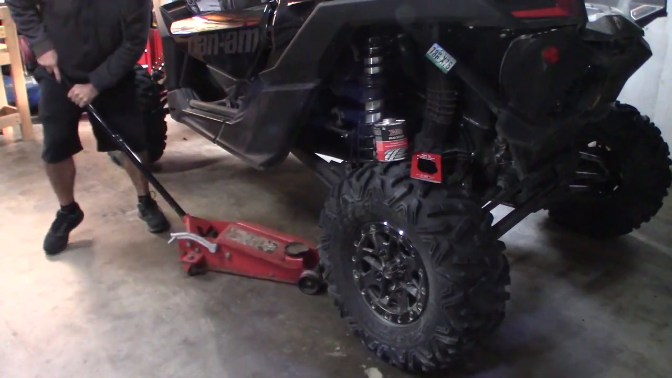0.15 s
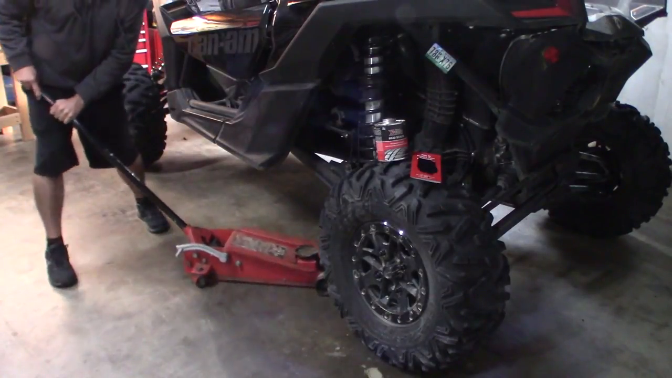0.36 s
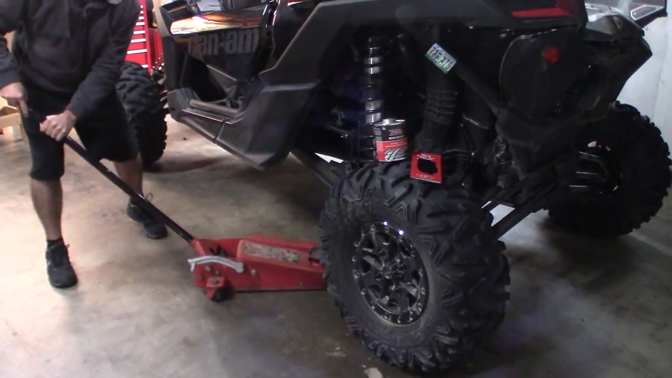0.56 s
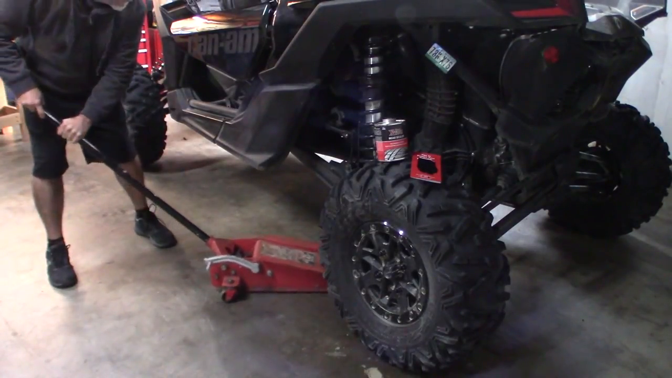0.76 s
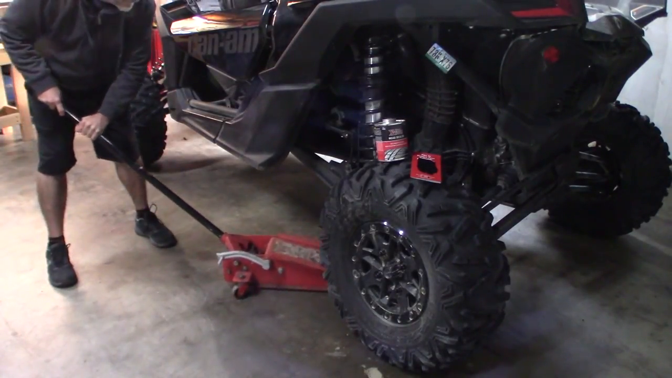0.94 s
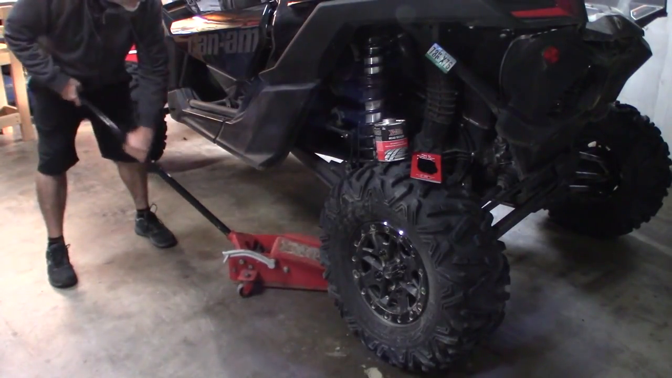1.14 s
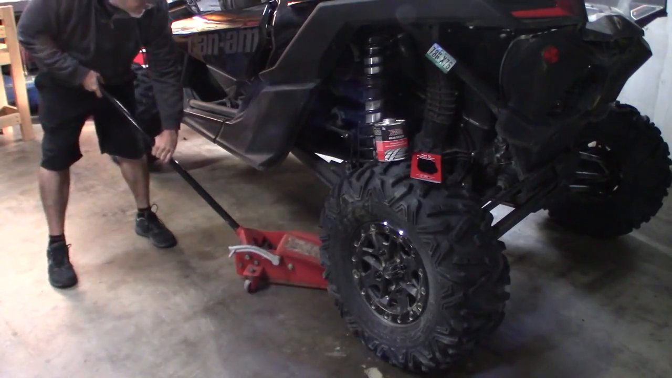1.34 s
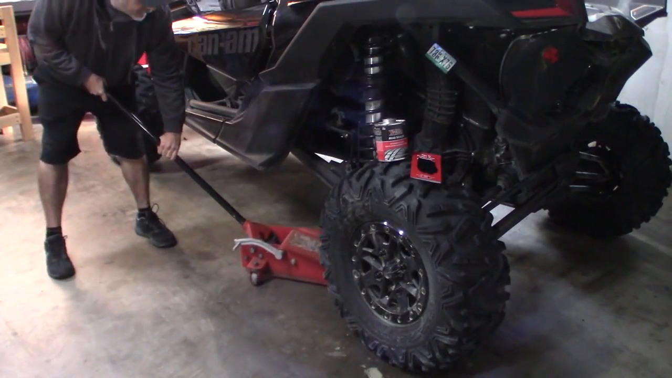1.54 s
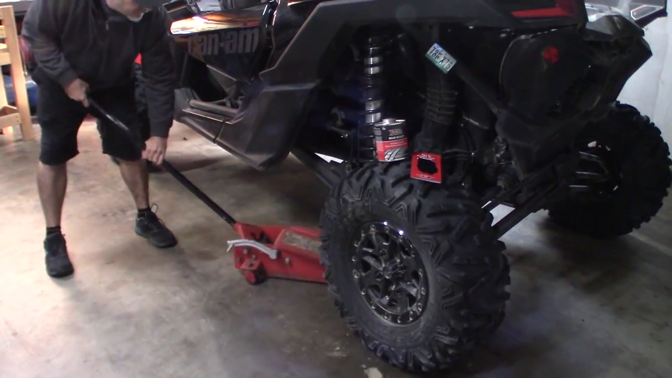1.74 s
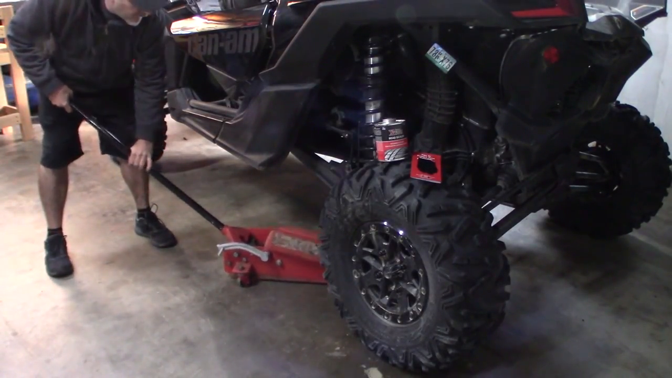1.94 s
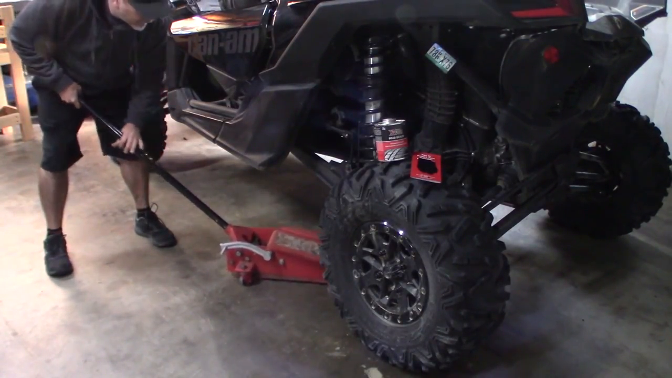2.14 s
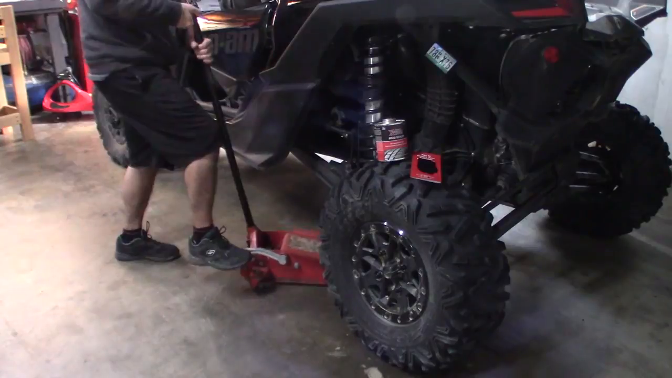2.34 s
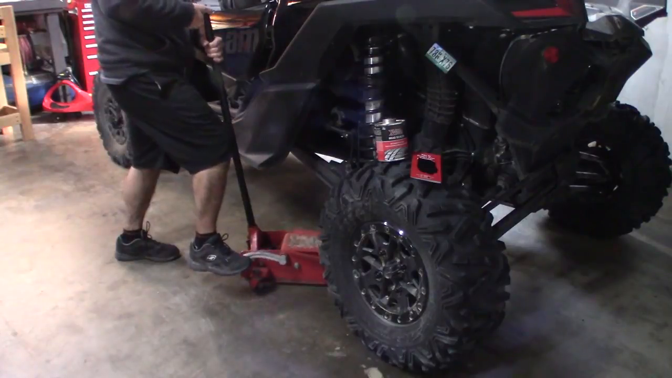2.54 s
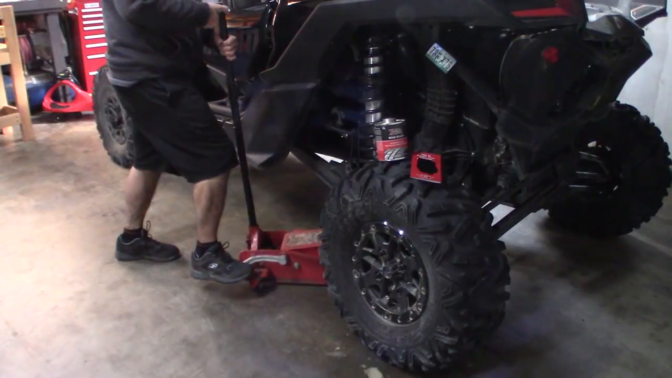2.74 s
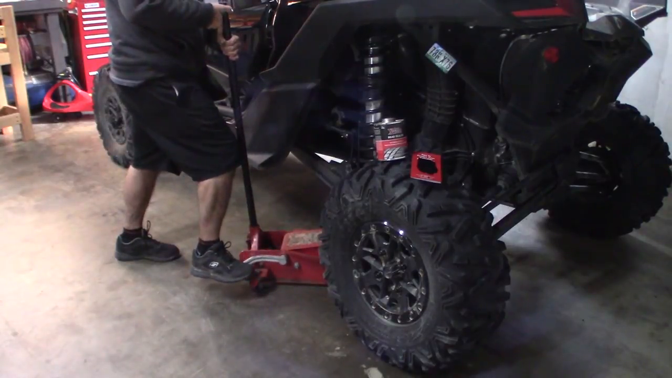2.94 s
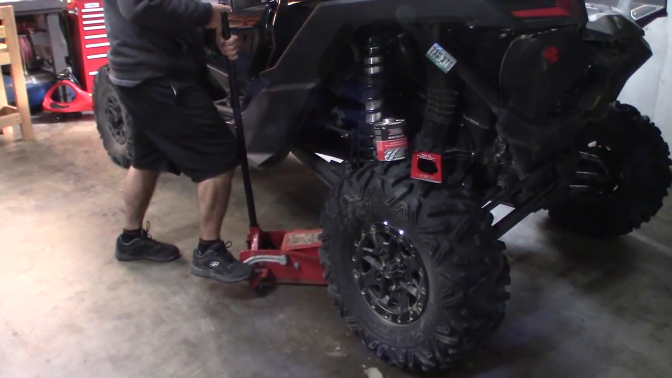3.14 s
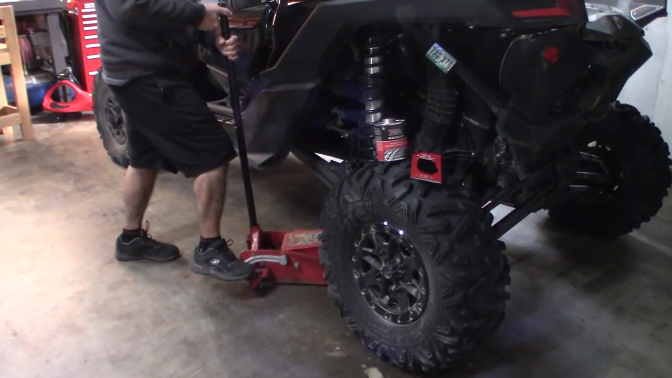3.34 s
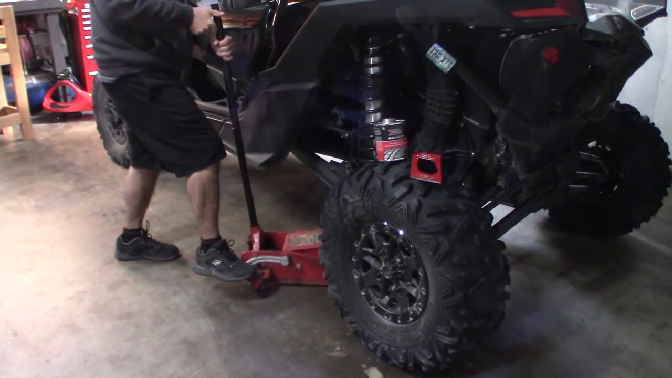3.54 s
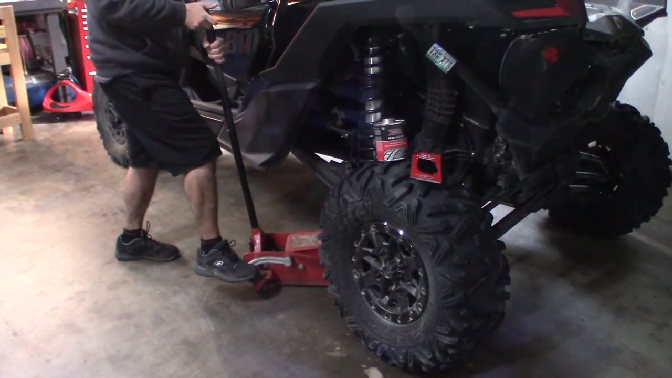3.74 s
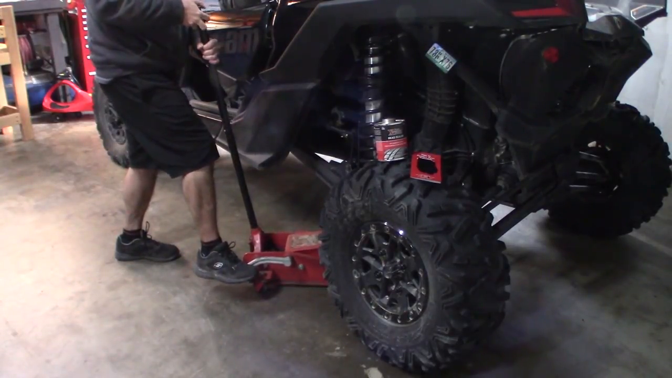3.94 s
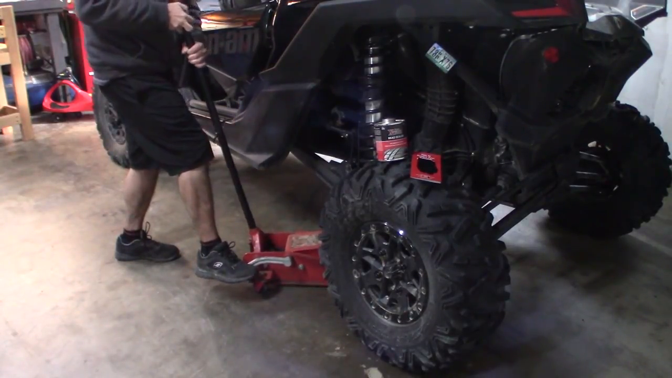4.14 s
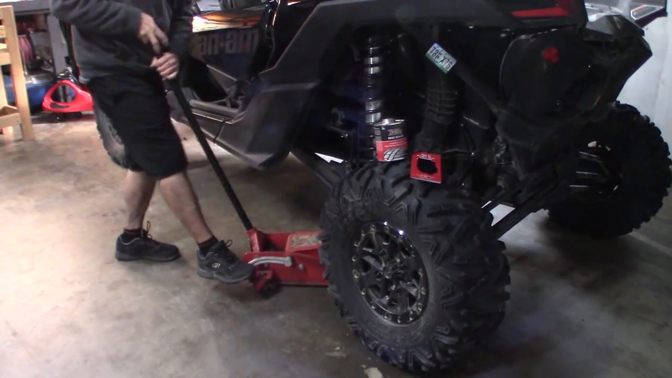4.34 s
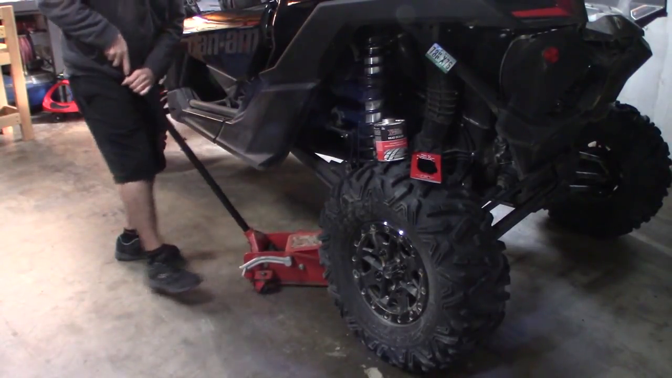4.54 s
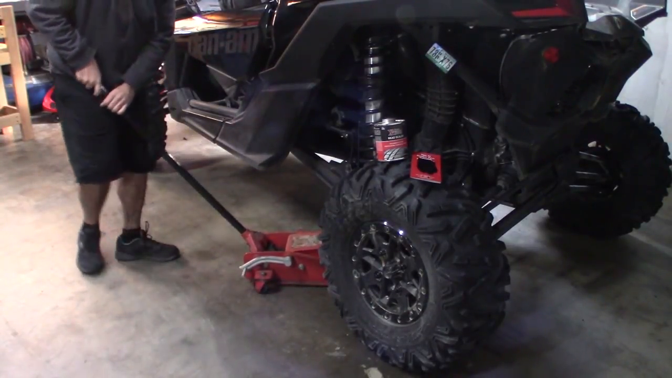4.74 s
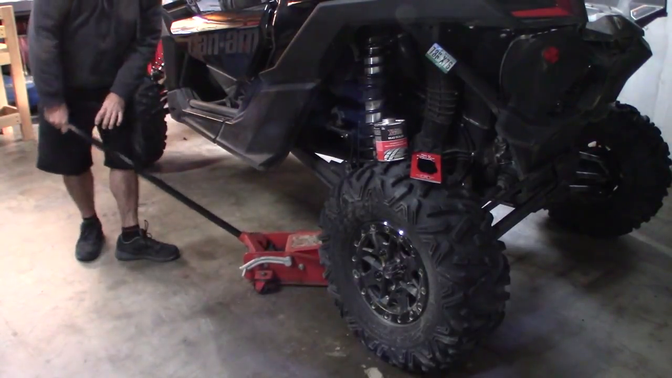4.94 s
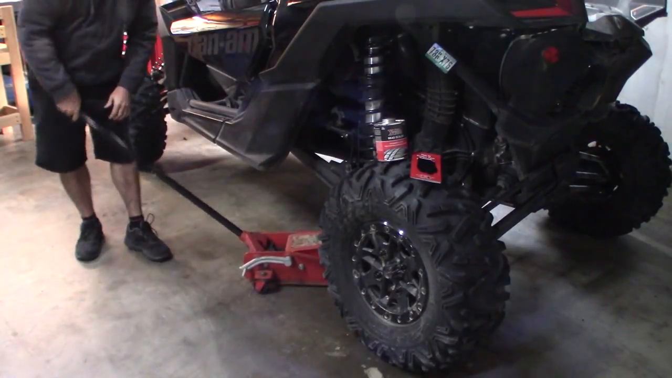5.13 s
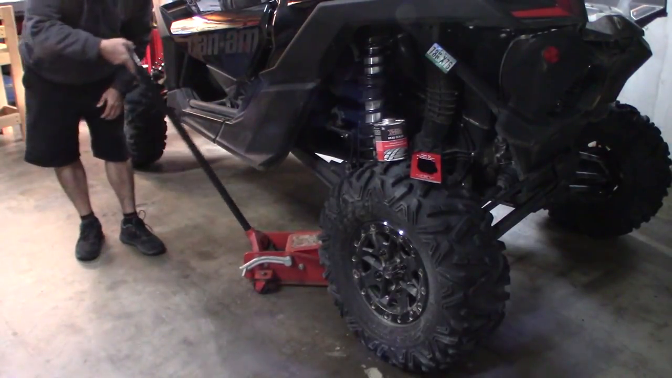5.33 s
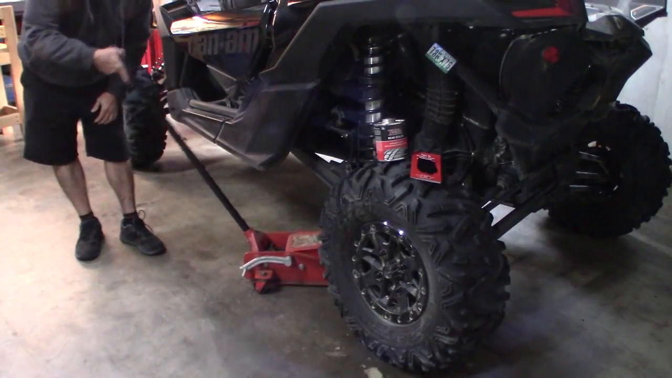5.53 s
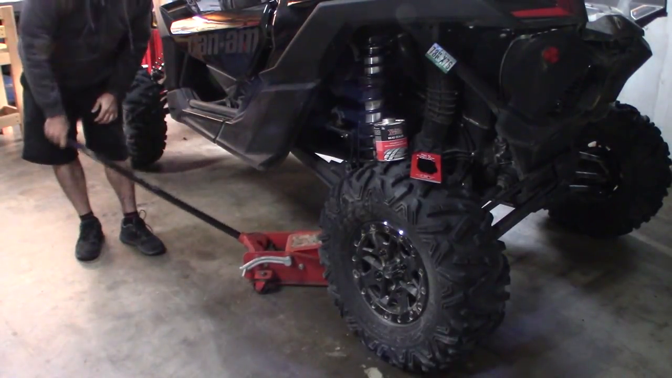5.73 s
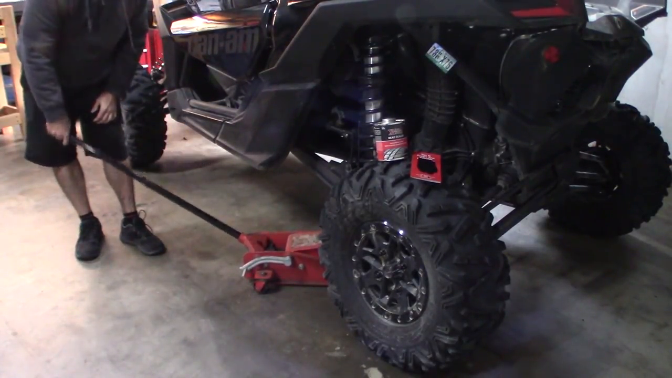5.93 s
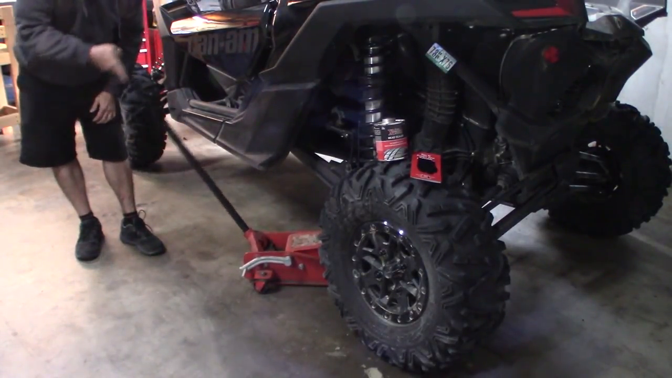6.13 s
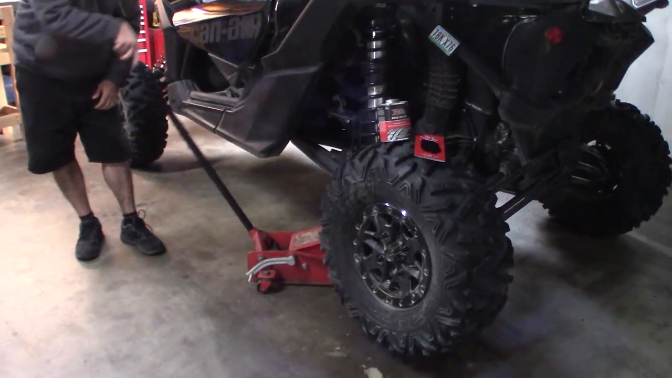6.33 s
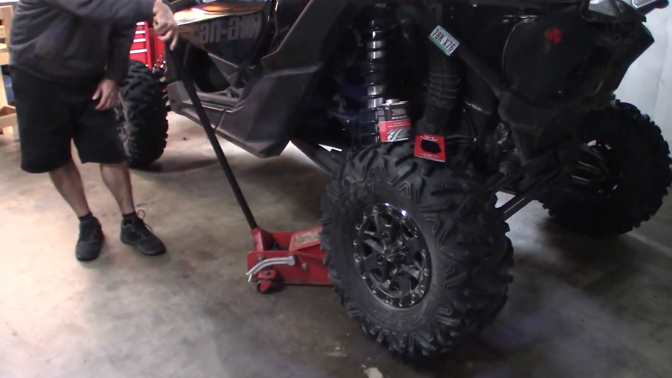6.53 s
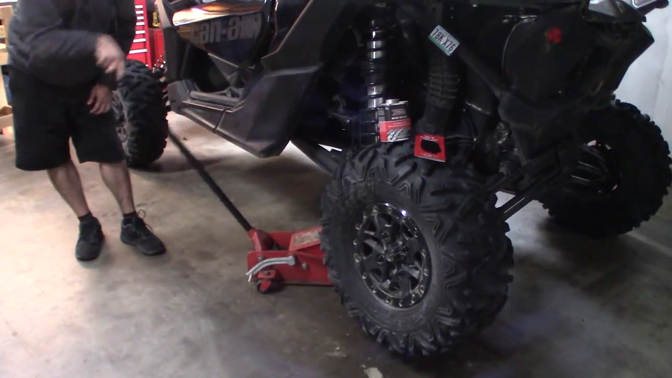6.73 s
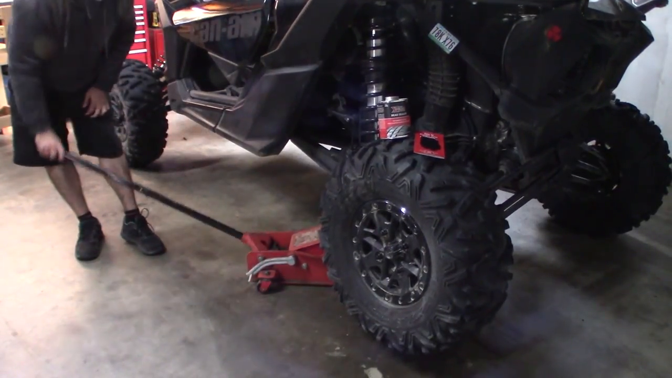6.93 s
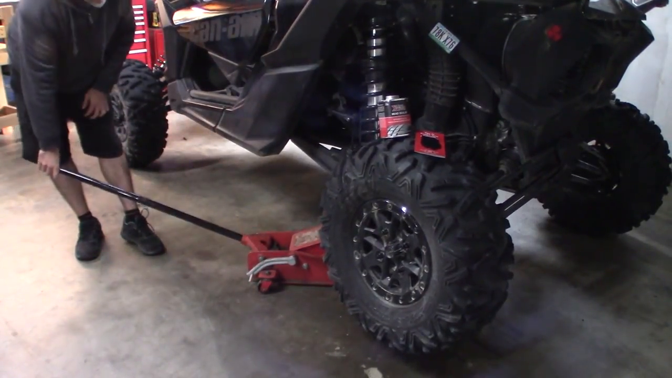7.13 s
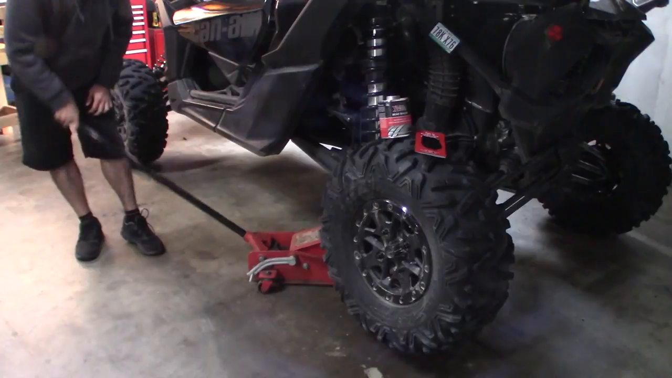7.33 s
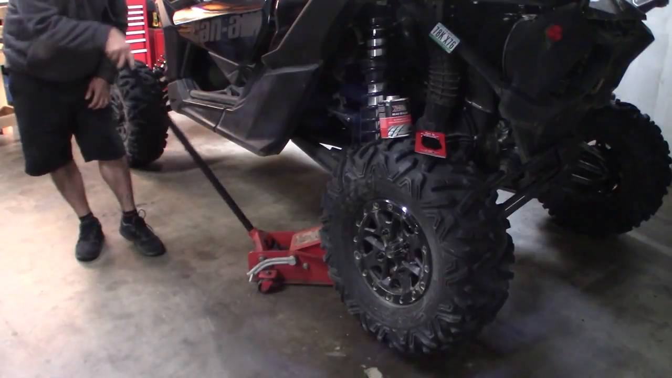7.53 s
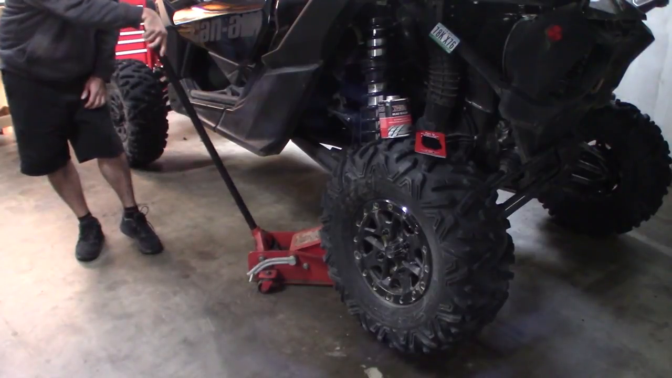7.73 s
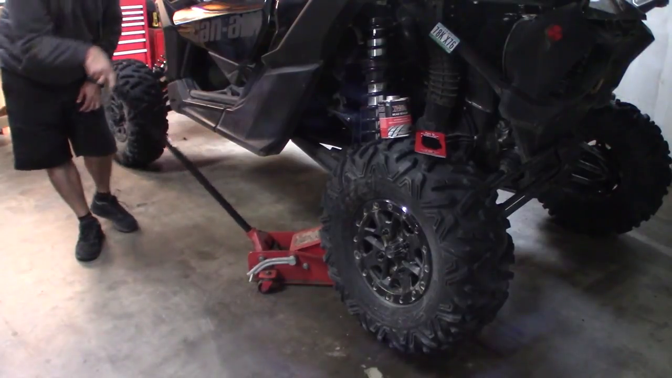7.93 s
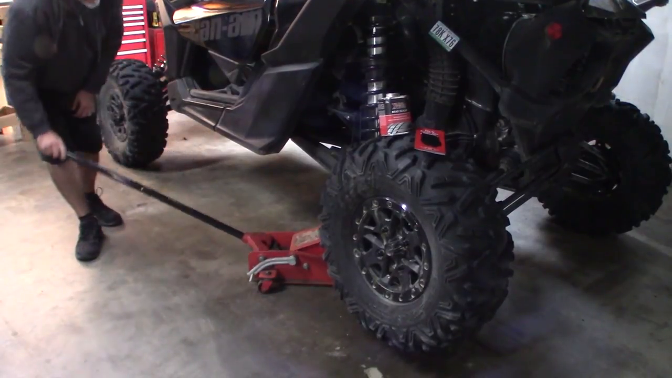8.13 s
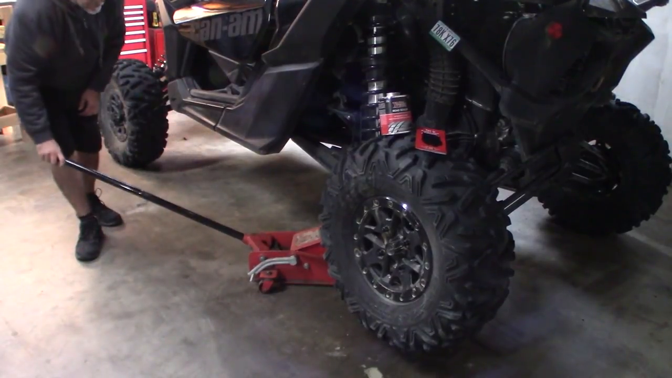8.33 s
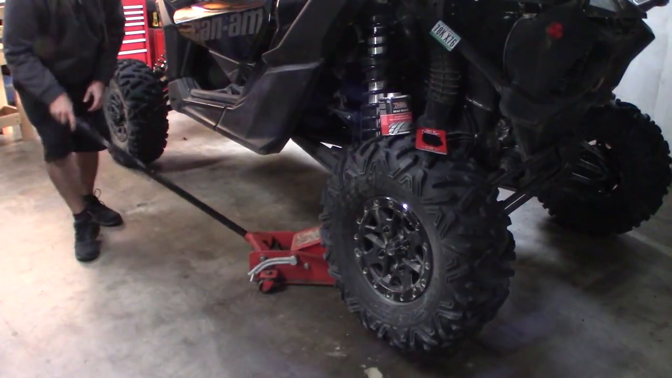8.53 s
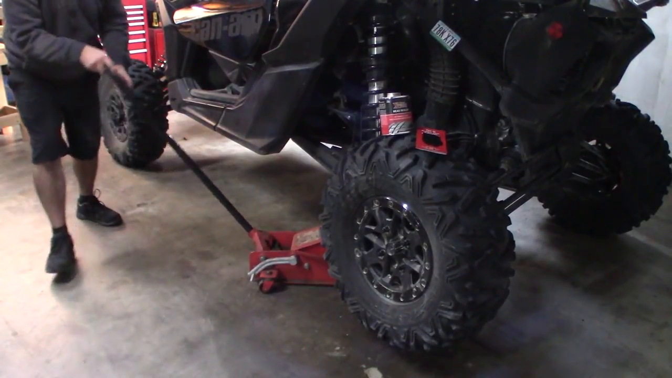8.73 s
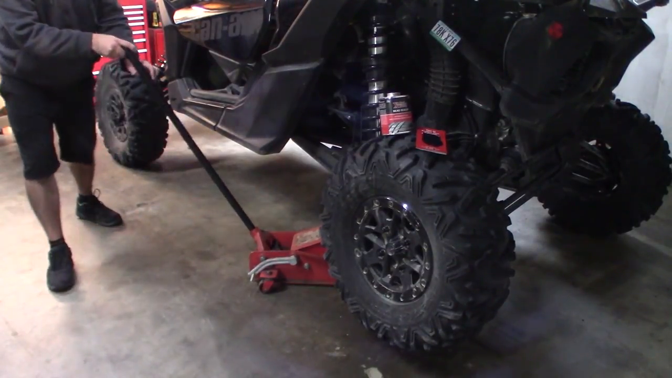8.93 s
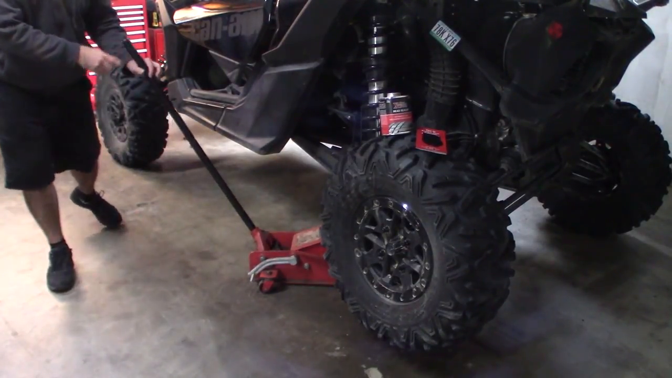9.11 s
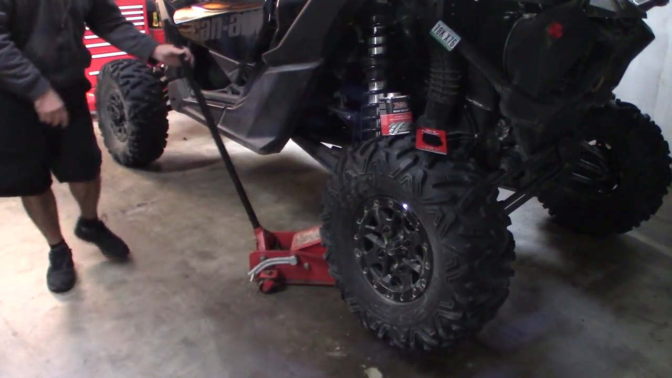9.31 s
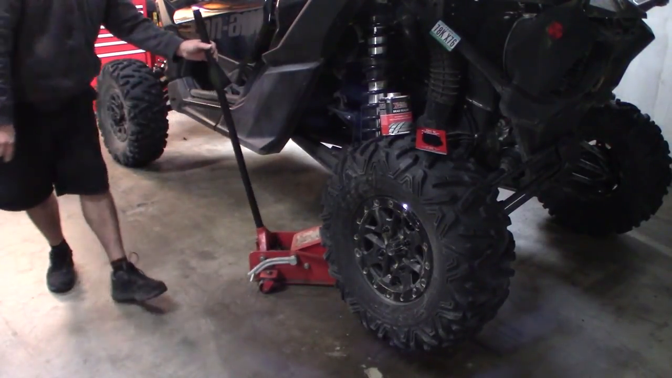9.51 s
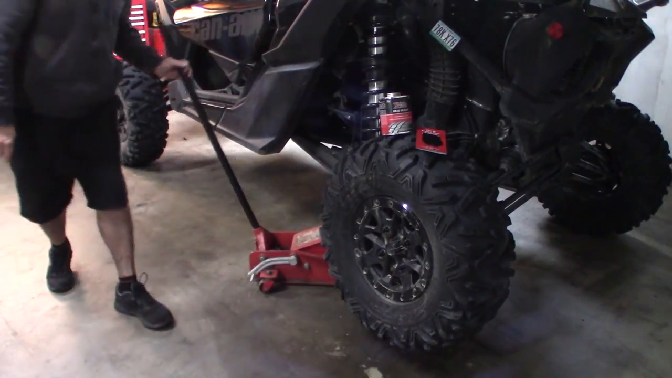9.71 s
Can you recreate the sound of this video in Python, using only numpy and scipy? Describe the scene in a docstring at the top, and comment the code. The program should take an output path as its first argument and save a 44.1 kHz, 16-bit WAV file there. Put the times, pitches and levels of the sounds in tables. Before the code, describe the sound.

Loud caster chatter and sharp metal clanks in an echoing garage, a short shrill squeak, a heavy handle drop, then uneven clunking pump strokes.

```python
"""Floor jack in a garage

A steel floor jack is rolled over concrete, shoved under a vehicle and pumped by its long handle.
Wheels and linkage chatter as noise-driven modes, a hollow part rings near 420 Hz, clanks are struck modes,
squeaks are stick-slip tones with overtones, and scuffs, perhaps of shoes, are swelling hiss.
Noise tails of the garage echo it all over a low hum of coloured noise."""
import sys
import numpy as np
from scipy import signal
from scipy.fft import rfft, irfft
from scipy.io import wavfile
from scipy.ndimage import uniform_filter1d

SR = 44100
rng = np.random.default_rng(int(sys.argv[2]) if len(sys.argv) > 2 else 0)


def transcribe(u):
    """Save the signal u as a 16-bit wav file named by the first command-line argument.

    u: samples, shape (n,) or (channels, n), limited to [-1, 1]; the rate is SR.
    q: integer samples, one column per channel.
    """
    v = np.clip(np.atleast_2d(u).T, -1, 1)
    q = np.round(v * 32767).astype(np.int16)
    wavfile.write(sys.argv[1], SR, q)


def voltage_ratio(level):
    """Linear amplitude factor for a level in decibels (scalar or array-like)."""
    return 10 ** (np.asarray(level, float) / 20)


N = 430857
TIME = np.arange(N) / SR

# moments at which movements of the chatter and all echoes stop dead: t/s
STOPS_S = [2.378, 6.315]


def unit(x):
    """Normalisation: scale to rms 1."""
    return x / np.sqrt(np.mean(x ** 2))


def colour(x, points):
    """Spectral shaping: weight the spectrum by (f/Hz, level/dB) points joined over log frequency."""
    hz, db = np.transpose(points)
    size = x.shape[-1]
    f = np.maximum(np.arange(size // 2 + 1) * SR / size, 1)
    gain = voltage_ratio(np.interp(np.log(f), np.log(hz), db))
    return irfft(rfft(x) * gain, size)


def band(x, lo_hz, hi_hz):
    """Band limitation: a Butterworth band-pass."""
    return signal.sosfilt(signal.butter(3, [lo_hz, hi_hz], "band", fs=SR, output="sos"), x)


def ring(x, hz, t60):
    """Damped resonance: one exponentially decaying mode driven by x."""
    radius = np.exp(-np.log(1000) / (t60 * SR))
    w = 2 * np.pi * hz / SR
    return signal.lfilter([np.sin(w)], [1, -2 * radius * np.cos(w), radius ** 2], x)


def body(x, modes):
    """Modal superposition: all (f/Hz, level/dB, t60/s) modes of an object driven by x."""
    return sum(voltage_ratio(db) * ring(x, hz, t60) for hz, db, t60 in modes)


def shudder(rows):
    """Exponential decay: sudden (t/s, level/dB, t60/s) onsets that die away, and a noise to be shaped."""
    level = np.zeros(N)
    for s, db, t60 in rows:
        level += voltage_ratio(db) * (TIME >= s) * 1000 ** (-np.maximum(TIME - s, 0) / t60)
    return level, rng.standard_normal(N)


# relative spectral density of the hum: f/Hz, level/dB per Hz
HUM_SPECTRUM = [(24, -67.5), (40, -39.5), (103, -7.5), (213, -7.5), (266, -9.5), (301, 0), (325, -21),
                (509, -38), (548, -15.5), (670, -10), (998, -17), (1250, -17), (2060, -24.5), (2270, -24),
                (15500, -40)]


def hum():
    """Stationary coloured noise: two independent low hums, for mid and side."""
    return voltage_ratio(-48.5) * unit(colour(rng.standard_normal((2, N)), HUM_SPECTRUM))


# reverberation time of the garage: f/Hz, t60/s
GARAGE_DECAY = [(100, 0.22), (300, 0.67), (800, 0.56), (2000, 0.5), (5000, 0.46), (12000, 0.37)]


def echo():
    """Diffuse reverberation: a tail of noise bands, each decaying at its own rate."""
    t = np.arange(SR // 2) / SR
    hz, t60 = np.transpose(GARAGE_DECAY)
    tail = np.zeros(len(t))
    for centre in 70 * 2. ** np.arange(8):
        octave = band(rng.standard_normal(len(t)), centre / np.sqrt(2), centre * np.sqrt(2))
        tail += octave * 1000 ** (-t / np.interp(np.log(centre), np.log(hz), t60))
    tail *= np.minimum(t / 0.0013, 1)  # onset ramp in s
    return tail / np.sqrt(np.sum(tail ** 2))


# weighting of the side signal, for echoes and hum: f/Hz, level/dB
SIDE_WIDTH = [(100, -14), (400, -23), (1000, -11), (2500, -10), (6000, -7), (12000, -6.5)]


def garage(jack):
    """Convolution with room responses: mid and side echoes, with a new tail from every second jolt on."""
    wet = np.zeros((2, N + SR))
    stops = [int(s * SR) for s in STOPS_S]
    # a new tail starts 10 ms ahead of the jolt, as from another spot
    turns = [int(jolt[0] * SR) - SR // 100 for jolt in JOLT_EVENTS[::2]]
    edges = sorted([0, N] + stops + turns)
    for a, b in zip(edges, edges[1:]):
        part = signal.fftconvolve(jack[None, a:b], [echo(), colour(echo(), SIDE_WIDTH)])
        end = min(stop for stop in stops + [N] if stop > a)
        wet[:, a:a + part.shape[1]] += part * (a + np.arange(part.shape[1]) < end)
    return wet[:, :N]


# modes of the underside of the vehicle: f/Hz, level/dB, t60/s
CHASSIS_MODES = [(118, -1, .2), (140, 0, .2), (175, -4, .15), (207, 0, .45), (283, -1, .2), (330, -6, .2)]
# the vehicle shudders after a knock: t/s, level/dB, t60/s
CHASSIS_BUMPS = [(2.76, -28.5, 3.6), (2.74, -18.5, 0.91), (3.66, -30, 0.29), (6.32, -41, 1),
                 (6.76, -32.5, .8), (7.94, -36.5, 0.87), (8.12, -37, .8)]


def chassis():
    """Panel resonance: big panels of the vehicle rumble on after a knock."""
    level, noise = shudder(CHASSIS_BUMPS)
    return level * unit(body(noise, CHASSIS_MODES))


# modes of the lifting arm: f/Hz, level/dB, t60/s
ARM_MODES = [(1300, 0, .13), (1085, -5, .1), (1735, -7, .08), (900, -9, .08)]
# heavy clunks that ring the arm: t/s, level/dB, t60/s
ARM_KNOCKS = [(.8, -20, 0.33), (4.463, -21, 0.36), (6.755, -21, .3), (7.25, -31, .3), (7.945, -23.5, .45),
              (8.515, -29, 0.37), (9.665, -33, .4)]


def arm():
    """Noise-driven resonance: the lifting arm rings roughly after heavy clunks."""
    level, noise = shudder(ARM_KNOCKS)
    return level * unit(body(noise, ARM_MODES))


# modes of the loose pins of the handle: f/Hz, level/dB, t60/s
PIN_MODES = [(3000, -2, 0.02), (3560, 2, 0.013), (3950, -3, .008), (5450, 2, 0.007), (7500, -2, 0.012),
             (8300, -8, 0.012)]
# the pins jingle: t/s, level/dB, t60/s
PIN_RATTLES = [(5.775, -21, 0.23), (5.948, -26, 0.14), (6.04, -35.5, 0.31), (6.265, -47, 0.38),
               (7.345, -36.5, 0.45), (8.565, -35, 0.36)]


def linkage():
    """Repeated micro-impact: loose pins jingle roughly when the handle turns round."""
    level, noise = shudder(PIN_RATTLES)
    return level * unit(body(noise, PIN_MODES))


# close group of modes of the hollow part, which throbs: f/Hz, level/dB, t60/s
HOLLOW_MODES = [(411, -2, .25), (429, 0, .28), (452, -11, .1), (382, -15, .1), (490, -14, .06)]
# the handle drops onto its stop: t/s, level/dB, t60/s
HANDLE_DROPS = [(4.458, -16, 0.18)]


def handle():
    """Impact excitation: the dropped handle shakes the hollow part, with a dull knock around it."""
    level, noise = shudder(HANDLE_DROPS)
    return level * (unit(body(noise, HOLLOW_MODES)) + 0.68 * unit(band(noise, 306, 570)))


# dry joints: t/s, length/s, f/Hz, level/dB, rms pitch waver as a share of f,
# second partial level/dB, third partial level/dB
JOINT_SQUEAKS = [(2.24, .075, 2820, -12, .04, -15, -22), (2.245, .12, 2680, -23, .035, -22, -32),
                 (2.47, .15, 1090, -39, .006, -30, -40), (2.6, .075, 1095, -25, .007, -22, -45),
                 (2.675, .06, 1100, -30, .007, -21, -45), (2.59, .145, 3170, -42, .008, -40, -40),
                 (4.85, .11, 2600, -27, .09, -14, -30), (2.388, .16, 5100, -51, .002, -30, -40),
                 (7.315, .17, 8600, -54, .002, -40, -40), (8.88, .22, 7700, -60, .01, -40, -40)]


def squeaks():
    """Stick-slip friction: a wavering tone with two overtones from a dry joint."""
    out = np.zeros(N)
    for s, length, hz, db, rough, second_db, third_db in JOINT_SQUEAKS:
        x = np.arange(int(length * SR)) / (length * SR)
        waver = unit(uniform_filter1d(rng.standard_normal(len(x)), size=120))
        phase = 2 * np.pi * np.cumsum(hz * (1 + rough * waver)) / SR
        tone = np.sin(phase) + voltage_ratio(second_db) * np.sin(2 * phase) + voltage_ratio(third_db) * np.sin(3 * phase)
        # high squeals catch quickly, low creaks swell
        envelope = np.sin(np.pi * x ** (.4 + 600 / hz)) * voltage_ratio(2 * waver)
        start = int(s * SR)
        out[start:start + len(x)] += voltage_ratio(db) * envelope * tone
    return out


# modes of the steel frame: f/Hz, level/dB and t60/s (clanks use the frequencies and 0.4 of t60)
FRAME_MODES = [(623, -34, 0.11), (760, 15, 0.18), (814, -38, 0.086), (1032, -7.5, 0.3), (1100, 0, 0.15),
               (1309, 11, 0.16), (1546, -10, 0.13), (1627, -12.5, 0.31), (1775, -1.5, 0.32),
               (1910, -9, 0.079), (2185, -29, 0.17), (2460, -4, 0.067), (2756, -20, 0.12),
               (3104, 18.5, 0.078), (3150, -4, 0.07), (3560, -6, 0.12), (3730, -6, .14), (4005, -17, 0.04),
               (4560, -29.5, 0.1), (4410, -30.5, .08), (4850, -11, 0.12), (5800, -32, .08),
               (5700, -4.5, .08), (6100, -16.5, .1), (7300, -23.5, .1), (7800, -7.5, 0.43),
               (8960, 10, 0.19), (8600, -9, .1)]
# metal on metal: t/s, relative peak level/dB, clunk f/Hz, clink f/Hz, clink level against peak/dB
METAL_CLANKS = [(0.23, -12.5, 2360, 2940, -25), (0.466, -1.5, 1270, 4480, -4), (0.639, -6, 1390, 3660, -28),
                (0.676, -2, 1910, 4840, -19), (1.191, -11.5, 1390, 8410, -3), (1.211, -11, 1430, 3840, 6),
                (1.261, -6, 1100, 2800, 4.5), (1.413, -6.5, 990, 2960, 0.5),
                (1.485, -2.5, 1610, 2990, -0.5), (1.599, -10.5, 2710, 3110, 1.5),
                (1.981, -7.5, 1675, 3030, 3.5), (2.733, -1, 1680, 2940, 3), (3.229, -50, 582, 8700, 8.5),
                (3.587, -18, 1060, 3040, -28), (3.818, -32, 1320, 4580, -7), (3.918, -35, 1050, 7570, -14),
                (4.22, -19.5, 1950, 3040, -14), (4.466, -5, 1340, 3440, -30), (4.739, -41, 721, 3190, 7),
                (5.209, -15, 1030, 4620, -14), (5.463, -8.5, 1610, 3470, -5), (5.596, -10, 1410, 2990, -15),
                (5.776, -25, 1710, 7300, -20), (5.928, -7, 727, 2820, -34), (6.034, -19, 1240, 3280, -2),
                (6.26, -25, 1790, 5900, 6), (6.42, -41, 1910, 2800, -6), (6.66, -30.5, 743, 5340, -1.5),
                (6.699, -26, 740, 7800, -5), (6.751, -9.5, 1740, 4380, -5), (7.18, -22, 1100, 3130, -27),
                (7.25, -14.5, 1730, 2800, -38), (7.314, -23, 1170, 8600, -7), (7.343, -22, 640, 3620, 4),
                (7.797, -25.5, 746, 2900, -27), (7.946, -7.5, 1290, 4020, -6), (8.083, -30, 1280, 3070, 6),
                (8.404, -31, 1740, 5700, -17), (8.51, -15.5, 635, 3380, -8), (8.565, -15, 960, 3520, 0.5),
                (8.827, -21.5, 614, 4400, -9), (8.915, -15, 650, 2800, -19), (8.958, -39, 1030, 2860, -17),
                (9.105, -44, 1110, 4390, 3), (9.433, -26.5, 748, 3040, -28), (9.571, -36, 797, 2870, -6),
                (9.66, -11.5, 935, 3120, -16.5)]


def clanks():
    """Selective modal excitation: a brief skid rings modes near clunk and clink, under a short crack."""
    s, db, clunk, clink, clink_db = np.transpose(METAL_CLANKS)
    at = (s * SR).astype(int)
    scatter = voltage_ratio(1.5 * rng.standard_normal((len(s), len(FRAME_MODES))))
    skid = [1, -np.exp(-1 / (0.0093 * SR))]  # time constant in s
    noise = rng.standard_normal(N)
    out = np.zeros(N)
    for k, (hz, _, t60) in enumerate(FRAME_MODES):
        # modes respond less the more octaves they lie from the clunk or clink
        near_clunk = voltage_ratio(-16 * np.log2(hz / clunk) ** 2)
        near_clink = voltage_ratio(clink_db - 60 * np.log2(hz / clink) ** 2)
        blows = np.zeros(N)
        blows[at] = voltage_ratio(db - 35.5) * scatter[:, k] * (near_clunk + near_clink)
        out += ring(signal.lfilter([1], skid, blows) * noise, hz, .4 * t60)
    blows = np.zeros((2, N))
    blows[:, at] = voltage_ratio([db - 22.0, db + clink_db - 13])
    low, high = signal.lfilter([1], [1, -np.exp(-1 / (.007 * SR))], blows)
    return out + low * unit(band(noise, 700, 2800)) + high * unit(band(noise, 2800, 10000))


def swell(s, rise, hold, fall_db_s, t):
    """Exponential growth and decay: power of each event, rising by 30 dB, held, then dying to a stop."""
    s = np.reshape(s, (-1, 1))
    rise = np.reshape(np.maximum(rise, .001), (-1, 1))
    hold = np.reshape(np.abs(hold), (-1, 1))
    db = -30 * np.maximum(s - t, 0) / rise - fall_db_s * np.maximum(t - s - hold, 0)
    stop = np.array(STOPS_S + [N / SR])[np.searchsorted(STOPS_S, s)]
    return voltage_ratio(2 * db) * (t < stop)


def movement(t, s, rise, hold, fall_db_s, db, parts_db):
    """Addition of powers: events summed in frame, thud, hollow ring, scrape and grit."""
    quick = swell(s, rise, hold, fall_db_s, t)
    slow = swell(s, rise, hold, 0.69 * fall_db_s, t)  # thud and hollow ring linger
    shapes = [quick, slow, slow, quick, quick]
    return np.array([voltage_ratio(2 * (db + part)) @ shape for part, shape in zip(parts_db, shapes)])


GRIT_TILT = 1.33  # grit dB per brightness dB

# sliding hiss, perhaps shoes: t/s, level/dB, rise/s, hold/s, grit level against scrape/dB
SCUFF_EVENTS = [(0.659, -12, 0.0025, 0.0069, -1.5), (2.03, -19.5, .04, 0.055, -27.5),
                (4.4, -42.5, 0.11, 0.024, -2), (4.879, -17.5, 0.061, 0.026, -6),
                (5.038, -32.5, 0.06, 0.19, -6), (5.232, -25.5, 0.11, 0.073, -4),
                (6.265, -49.5, .01, .045, 16.5), (7.528, -59, .03, 0.3, 1), (8.4, -40, 0.0051, 0.019, 3.5),
                (9.1, -55, .01, 0.048, 4.5)]


def scuffs(t):
    """Sliding friction: power of swelling hiss, with little frame and bass."""
    s, db, rise, hold, grit = np.transpose(SCUFF_EVENTS)
    frame_db, bass_db = -17, -27
    return movement(t, s, rise, hold, 297.5, db, [frame_db, bass_db, bass_db, 0, grit])


# the handle is pressed down and the loaded frame groans:
# t/s, level/dB, hold/s, then relative to it brightness level/dB, thud level/dB
STROKE_EVENTS = [(3.673, -43.5, .04, 0, 1), (6.387, -54.5, 0.27, -24, 0.5), (6.912, -26.5, 0.097, -6.5, -2),
                 (7.35, -33.5, 0.019, -6, 2), (7.503, -59, 0.067, 11, 11), (8.11, -27, 0.051, -3, 3.5),
                 (8.214, -30.5, 0.056, -7, -1), (8.657, -55, 0.07, -4, 9), (8.975, -52, 0.029, 6, 9.5),
                 (9.3, -62.5, 0.12, -17, 13), (9.488, -49.5, 0.063, -10, 7)]


def strokes(t):
    """Frictional groan under load: power of slow swells that leave the hollow part silent."""
    s, db, hold, bright, thud = np.transpose(STROKE_EVENTS)
    parts_db = [0, thud, -np.inf, bright, GRIT_TILT * bright - 10]
    return movement(t, s, 0.26, hold, 182, db, parts_db)


# a knock sets the frame chattering:
# t/s, level/dB, hold/s, then relative to it brightness level/dB, hollow ring level/dB
JOLT_EVENTS = [(1.209, -15, 0.071, -3.5, 3.5), (1.401, -21, 0.045, 2.5, -22), (1.478, -9, 0.088, -1, 0.5),
               (1.978, -12.5, 0.052, 4, -26), (2.39, -36, 0.022, -11, 6.5), (2.461, -45, 0.13, -4, 5),
               (2.731, -13.5, 0.13, 4.5, 1.5), (3.385, -58.5, 0.23, 6, 11.5),
               (3.58, -33.5, 0.033, -4.5, -2), (3.906, -43, .05, -11, 7.5), (4.218, -25, 0.02, -1, -2),
               (4.445, -8.5, 0.028, -11, -5.5), (4.97, -38, 0.14, -9, 1), (5.114, -34.5, 0.023, -16, 8),
               (5.208, -35.5, 0.058, 2, 12), (5.457, -14.5, 0.013, -5.5, 2.5),
               (5.598, -18, 0.038, -7, -1.5), (5.761, -24, 0.034, -1.5, 4), (5.923, -19, 0.022, -6.5, -6),
               (6.028, -28.5, 0.053, -6.5, 7), (6.239, -37, .06, -12, 6.5), (6.307, -42, 0.034, -10, 0),
               (6.416, -52, 0.016, 4.5, -13), (6.656, -44, 0.037, -0.5, 6), (6.744, -12, 0.039, -7, -7),
               (7.176, -28, 0.034, -7.5, -1), (7.239, -21.5, 0.023, -12.5, -25),
               (7.337, -25.5, 0.017, -6, -14), (7.776, -38.5, 0.037, -10, -3), (7.925, -14, 0.048, -9, -29),
               (8.397, -33, 0.023, -8, -6), (8.496, -26, 0.053, -11.5, -24),
               (8.567, -28.5, 0.02, -5.5, -15), (8.83, -40, 0.015, 3, -12), (8.9, -39, 0.044, -4, -2),
               (9.419, -34, 0.01, -38, -2), (9.599, -38.5, .03, -11.5, 8), (9.645, -29, 0.15, -8.5, -6)]


def jolts(t):
    """Contact stiffness: power of knocks, where a duller one is softer and builds up more slowly."""
    s, db, hold, bright, hollow = np.transpose(JOLT_EVENTS)
    rise = np.minimum(.004 * voltage_ratio(-bright), .02)  # s
    loaded_s = 6.5  # from here the jack carries the vehicle and thuds more
    thud = np.where(s > loaded_s, -7, -34.5)
    parts_db = [0, thud, hollow, bright, GRIT_TILT * bright - 14]
    return movement(t, s + 0.71 * rise, rise, hold, 240, db, parts_db)


# the jack rolls on its casters:
# t/s, frame chatter level/dB, then relative to it brightness level/dB, hollow ring level/dB
ROLL_COURSE = [(0, -17, -4.5, 4.5), (.18, -14, -1.5, 1), (.3, -20.5, -0.5, 6), (.43, -19, 0, 9),
               (.5, -11.5, -2, 4.5), (.63, -17, -13, 1), (.7, -8, -6.5, 2.5), (.85, -5.5, -11, -4),
               (.95, -28, -2.5, 9), (1.05, -32.5, -10.5, 11), (1.18, -50.5, 4.5, 18), (1.65, -27, 7.5, 5.5),
               (1.75, -24, -10, 8.5), (1.83, -15, -1.5, 7), (1.96, -29, -10.5, 11.5),
               (2.2, -43.5, -5, 10.5), (2.25, -36.5, -38, 25.5), (2.34, -22.5, -3.5, -7),
               (2.39, -27, -2, 27)]


def roll(t):
    """Rolling excitation: power of the caster chatter along a drawn course, up to the first stop."""
    s, *columns = np.transpose(ROLL_COURSE)
    db, bright, hollow = (np.interp(t, s, column) for column in columns)
    parts_db = np.array([0 * db, 0 * db - 22, hollow, bright, GRIT_TILT * bright - 8])
    return voltage_ratio(2 * (db + parts_db)) * (t < STOPS_S[0])


def levels():
    """Incoherent summation: the powers of all movements add up to gains of the five parts."""
    t = TIME[::32]
    power = roll(t) + jolts(t) + strokes(t) + scuffs(t)
    # each part of the jack rattles unevenly in its own way
    flicker = unit(uniform_filter1d(rng.standard_normal(power.shape), size=30))
    flicker[2] = 0  # the hollow ring throbs by itself
    return [np.interp(TIME, t, gain) for gain in np.sqrt(power) * voltage_ratio(1.5 * flicker)]


def contacts(rate, scatter_db, smooth):
    """Random impact process: dense tiny knocks of uneven size over a share of smooth rubbing."""
    hit = rng.random(N) < rate / SR
    size_db = scatter_db * np.minimum(rng.exponential(size=N), 4)
    knocks = hit * rng.standard_normal(N) * voltage_ratio(size_db)
    return unit(knocks) + smooth * rng.standard_normal(N)


# broad colour of the chatter: f/Hz, level/dB per Hz
STEEL_COLOUR = [(24, -69.5), (40, -32.5), (109, -24), (237, -23.5), (433, -9.5), (529, -4), (830, -9.5),
                (1340, -6), (3920, -15.5), (5040, -13), (8750, -16), (11800, -46.5), (14100, -47.5),
                (16000, -80)]
# top treble against grit: t/s, level/dB
TREBLE_SHEEN = [(0, -13.5), (1.2, -13), (1.9, -15), (2.2, -30), (4.2, -29.5), (5.7, -22.5), (7, -24),
                (9.77, -18)]


def chatter():
    """Forced vibration: rolling, rubbing and rattling shake the frame, the hollow part and the floor."""
    frame, thud, hollow, scrape, grit = levels()
    push = contacts(rate=2500, scatter_db=2.5, smooth=.7)  # rate in knocks per s
    # the load on the wheels jolts some tens of times a second
    push = push * voltage_ratio(1.25 * unit(band(rng.standard_normal(N), 10.55, 37.0)))
    steel = unit(colour(push, STEEL_COLOUR)) + 0.062 * unit(body(push, FRAME_MODES))
    out = voltage_ratio(-3.5) * thud * unit(band(steel, 53, 410))
    out += voltage_ratio(-6.0) * frame * unit(band(steel, 727, 1397))
    out += voltage_ratio(-3.5) * scrape * unit(band(band(steel, 1296, 4310), 1720, 6800))
    out += voltage_ratio(-5.0) * grit * unit(band(band(steel, 4070, 11500), 3000, 11770))
    sheen = voltage_ratio(np.interp(TIME, *np.transpose(TREBLE_SHEEN)))
    out += sheen * grit * unit(band(push, 9500, 13070))
    return out + voltage_ratio(-6.0) * hollow * unit(body(push, HOLLOW_MODES))


def scene():
    """Direct and reverberant field: the jack and its echoes, which reach the two sides differently."""
    jack = chassis() + arm() + linkage() + handle() + squeaks() + clanks() + chatter()
    # the jack's own sound holds no deep bass
    jack = band(jack, 115, 18000)
    wet_mid, wet_side = garage(jack)
    hum_mid, hum_side = hum()
    mid = jack + voltage_ratio(-7.5) * wet_mid + hum_mid
    side = voltage_ratio(-8.5) * wet_side + colour(hum_side, SIDE_WIDTH)
    side = side + 0.033 * mid  # leans slightly to the first channel
    return np.array([mid + side, mid - side])


def low_pass(x):
    """Removes everything above the highest recorded frequency."""
    return signal.sosfilt(signal.butter(12, 16120, fs=SR, output="sos"), x)


def record(dry):
    """Saturation and high-pass: the small microphone rounds the loudest peaks and loses the deep bass."""
    rounded = np.tanh(1.078 * dry) / 1.293
    low_cut = signal.butter(2, 55, "high", fs=SR, output="sos")  # Hz
    thin = signal.sosfilt(low_cut, rounded)
    return low_pass(thin)


dry = scene()
out = record(dry)
transcribe(out)
```